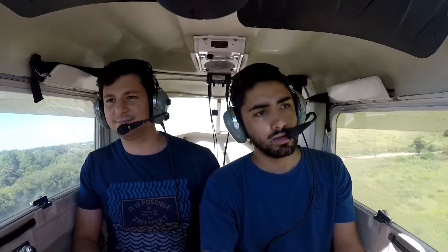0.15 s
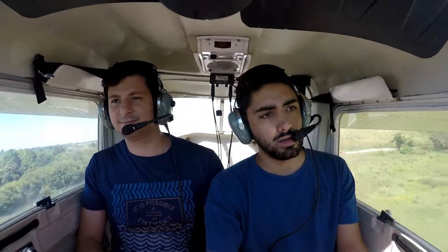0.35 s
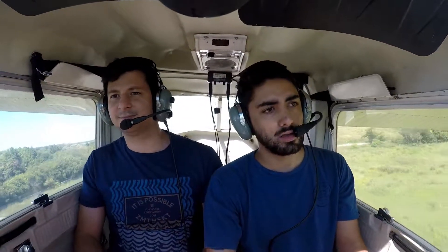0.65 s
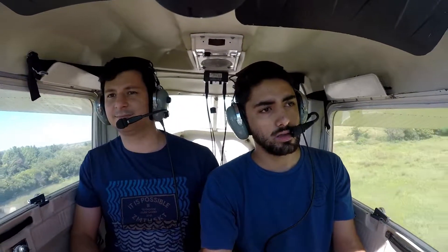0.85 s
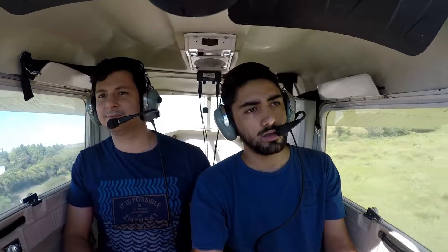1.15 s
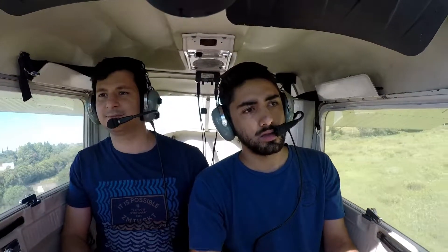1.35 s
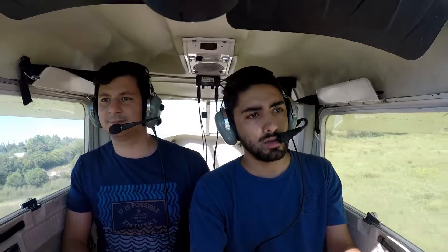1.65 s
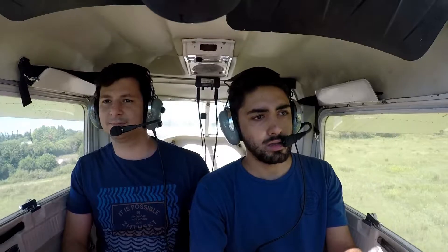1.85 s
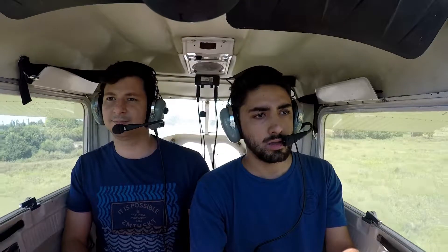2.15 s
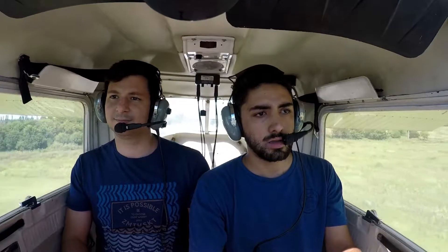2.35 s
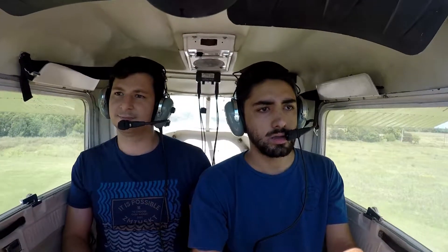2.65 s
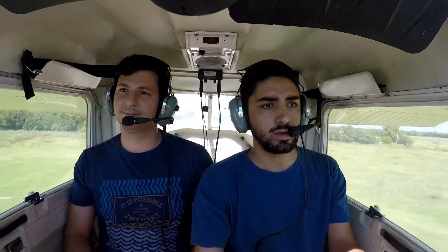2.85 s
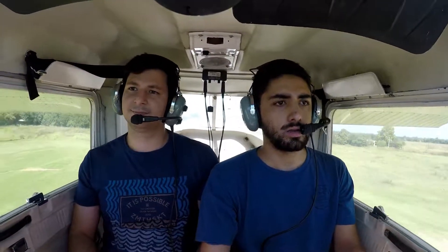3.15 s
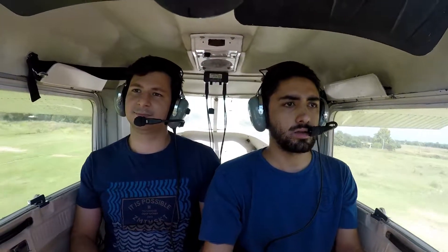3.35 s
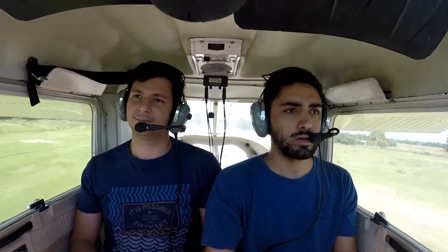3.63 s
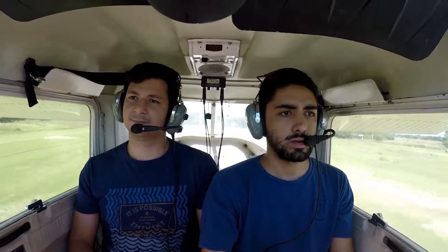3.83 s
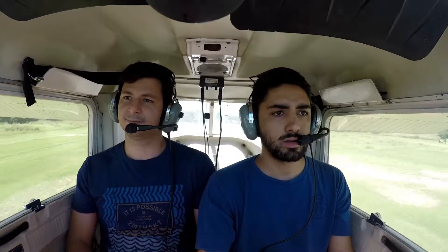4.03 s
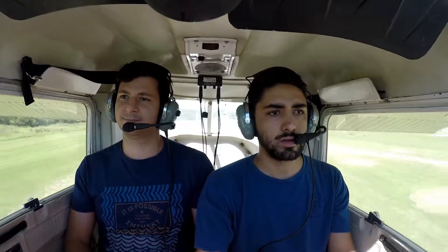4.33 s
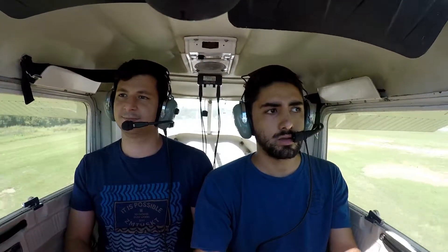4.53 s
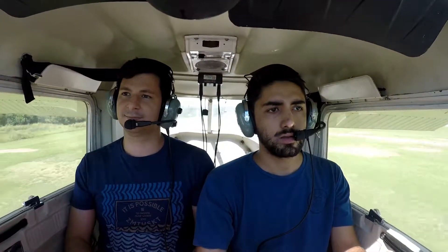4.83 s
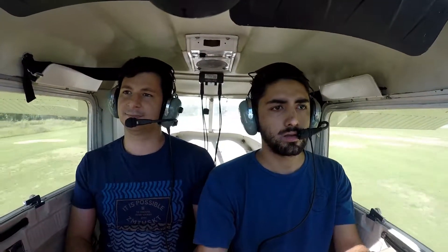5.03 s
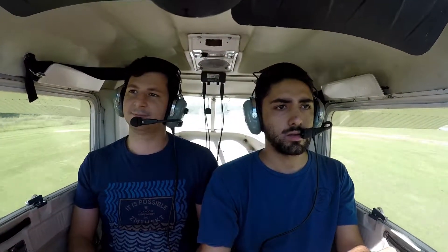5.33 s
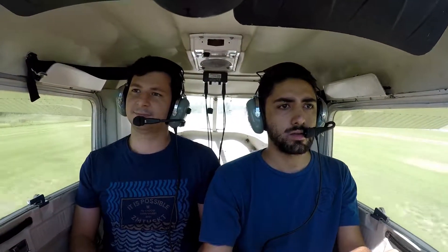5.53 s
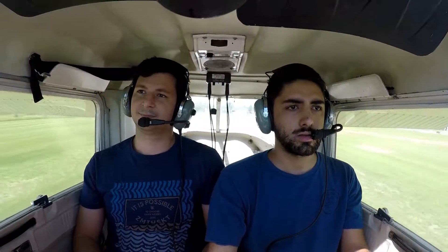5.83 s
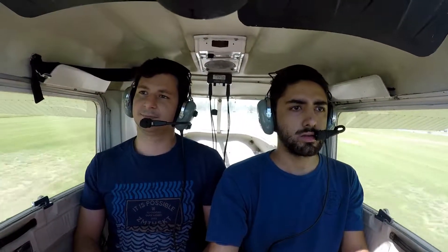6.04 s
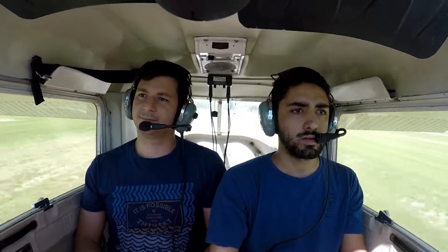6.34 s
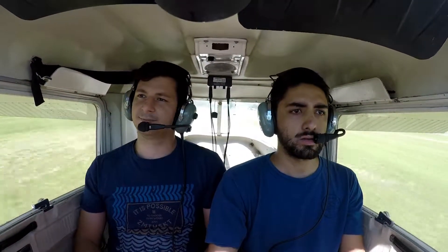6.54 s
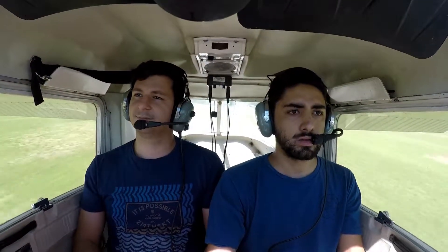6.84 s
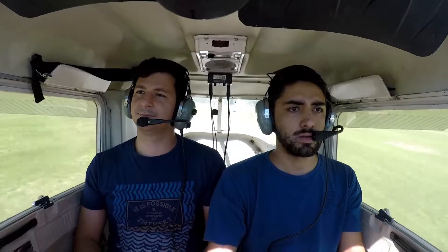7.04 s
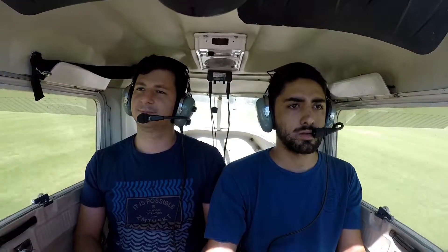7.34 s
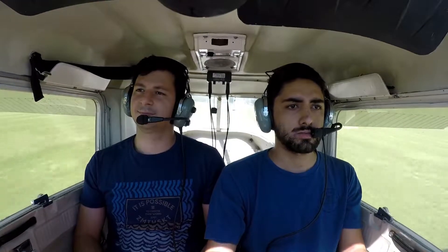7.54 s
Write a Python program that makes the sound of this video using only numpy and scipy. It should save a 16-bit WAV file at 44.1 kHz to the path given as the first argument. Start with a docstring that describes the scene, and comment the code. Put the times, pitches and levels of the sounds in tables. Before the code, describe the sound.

Close, gritty wind noise in a light plane's cramped cabin: bass-heavy puffs and rumbling thumps, uneven in timing, slightly rounded off at their peaks. A continuous midrange rush and low panel thrum sit behind, with faint airy hiss on top. Each puff lifts the other layers a little. The flow rises and falls without stopping, and no engine is audible.

```python
"""Wind lumps, roar and hiss fill the cabin of a light aircraft gliding in; no engine is heard.
Loudest are the draughts at the microphone itself, low irregular lumps of shaped noise with gaps between.
Behind them the airstream thrums and roars along the thin skin and hisses through door and window gaps.
Gusts flicker through all the layers together, and each low lump also lifts the thrum, roar and hiss."""
import sys
import numpy as np
from scipy import signal
from scipy.io import wavfile
from scipy.ndimage import uniform_filter1d

SR = 44100
rng = np.random.default_rng(int(sys.argv[2]) if len(sys.argv) > 2 else 0)


def pcm_store(signal):
    """Save signal as 16-bit PCM."""
    levels = np.round(np.clip(np.atleast_2d(signal), -1, 1) * 32767)
    wavfile.write(sys.argv[1], SR, levels.astype(np.int16).T)


N = 338688  # samples


def gain_of(db):
    """Amplitude factor for a level in dB."""
    return 10 ** (np.asarray(db) / 20)


def evened(x):
    """Scales a signal to rms 1."""
    return x / np.sqrt(np.mean(x ** 2) + 1e-20)


def curve(rows, column, t):
    """Straight-line drift between the table's points in time."""
    rows = np.array(rows)
    return np.interp(t, rows[:, 0], rows[:, column])


def bumps(rows, column, t):
    """Each row is one smooth rise or dip, its length measured at half height."""
    total = np.zeros(len(t))
    for row in rows:
        centre_s, length_s = row[0], row[1]
        near = slice(*np.searchsorted(t, [centre_s - length_s, centre_s + length_s]))
        phase = np.pi / 2 * (t[near] - centre_s) / length_s
        total[near] += row[column] * np.cos(phase) ** 2
    return total


def waver(lo_hz, hi_hz):
    """Slow chance of rms 1: sines of random phase, the slower ones taller."""
    t = np.arange(0, N + 64, 64) / SR
    hz = np.geomspace(lo_hz, hi_hz, num=40)[:, None]
    sines = np.sin(2 * np.pi * (hz * t + rng.random(hz.shape)))
    slow = (sines / np.sqrt(hz)).sum(0)
    return np.interp(np.arange(N) / SR, t, evened(slow))


def flutter(hz):
    """Quick chance of rms 1: noise between 18 Hz and hz, leaning toward short upward spurts."""
    band = signal.butter(2, [18, hz], "bandpass", fs=SR, output="sos")
    quick = evened(signal.sosfilt(band, rng.standard_normal(N)))
    return evened(quick + 0.25 * (quick ** 2 - 1))


def turbulence(points, size, patchy_db, tilt, pivot_hz=60):
    """Random short-time spectra of the given colour with drifting bright and dull patches."""
    hop = size // 4
    frames, hz = N // hop + 5, np.fft.rfftfreq(size, 1 / SR)
    real, imaginary, patches = rng.standard_normal((frames, len(hz), 3)).T
    patches = uniform_filter1d(patches, size=9, axis=0)  # blurred across frequency
    patches = evened(uniform_filter1d(patches, size=7, axis=1))  # and across time
    point_hz, point_db = np.transpose(points)
    colour_db = np.interp(np.log(hz + 1), np.log(point_hz + 1), point_db, left=-90, right=-90)[:, None]
    # a positive tilt (dB per octave) lifts what lies below the pivot and lowers what lies above
    octaves = np.clip(np.log2((hz[:, None] + 10) / pivot_hz), -2, 1.3)
    lean_db = -octaves * tilt(np.arange(frames) * hop / SR)
    spectra = (real + 1j * imaginary) * gain_of(colour_db + lean_db + patchy_db * patches)
    return evened(signal.istft(spectra, nperseg=size, noverlap=size - hop)[1][:N])


def steadied(x, seconds, share):
    """Takes out part of the chance swells of narrow noise, so the level curves set the loudness."""
    size = max(int(seconds * SR), 1)
    power = uniform_filter1d(uniform_filter1d(x ** 2, size), size)
    return evened(x / (abs(power) + 1e-3) ** (np.clip(share, 0, 1) / 2))


# Airstream outside, slow drift, shared by gaps and skin: start_s, thrum_db, roar_db, hiss_db
AIRSTREAM = [(0, -36, -38, -49), (0.35, -33.5, -37, -49), (0.65, -37, -36.5, -47.0),
             (0.95, -34.5, -36.5, -48.5), (1.5, -32, -36.5, -48.5), (2, -35, -36.5, -49),
             (2.35, -30, -35.5, -46.5), (2.6, -35.5, -37.5, -49.5), (3.2, -35.5, -38.0, -50),
             (3.75, -38.5, -37, -51.0), (4.1, -34.5, -37, -50), (4.4, -35, -39.5, -49.5),
             (4.8, -30, -33.5, -44.5), (5.15, -33, -37.5, -50), (5.5, -34, -36, -49),
             (5.85, -33.5, -38.5, -49.5), (6.5, -35.5, -38, -48.5), (6.8, -31.5, -35.5, -46.5),
             (7.1, -32.5, -36.5, -46), (7.4, -31, -33.7, -44.5), (7.68, -35.5, -34.5, -47)]
# Short gusts, and lulls where negative, shared by gaps and skin:
# centre_s, length_s, thrum_lift_db, roar_lift_db, hiss_lift_db
SHORT_GUSTS = [(0.259, 0.038, 4, 4, 2), (0.372, 0.03, 2, -1, -1), (0.434, 0.017, 0, 1.5, -2),
               (0.708, 0.027, 1, 1, 2.4), (0.913, 0.019, 7.5, 0, 2), (1.006, 0.017, -2, 0, 3.5),
               (1.04, 0.012, 0, 3.5, 0), (1.205, 0.014, 0, 1.5, 3), (1.292, 0.013, 0, 1.5, 3),
               (1.585, 0.02, 6, 2.5, 1), (1.645, 0.013, 0, 3.5, 0), (1.987, 0.012, 3, 4.5, 1),
               (2.157, 0.013, 0, 0, 2.7), (2.205, 0.012, -2, 4.5, 2), (2.368, 0.028, -2, -2, -2),
               (4.645, 0.015, 2, 3, 0), (4.787, 0.011, 1, 2.5, 0.5), (4.817, 0.012, 3, 3, 1),
               (4.879, 0.02, -9, -0.5, 0), (5.105, 0.012, 0, 1, 1), (5.134, 0.011, 0, -2, -2.5),
               (5.681, 0.024, 4, 1, 0), (6.37, 0.012, 4, 3, 1), (6.732, 0.013, 0, 3, -2),
               (6.917, 0.012, 0, 0, -1), (7.119, 0.015, 0, 2, 3), (7.545, 0.018, 2, -1, -1),
               (0.494, 0.02, -1, 4.5, 3), (0.555, 0.041, 4.5, 1, 1.4), (0.898, 0.033, -3, -3.5, -3),
               (1.068, 0.035, 9, 3, 1), (1.377, 0.032, 0.5, 1.0, 3.1), (1.425, 0.052, 5, 0.1, 0.1),
               (1.51, 0.032, 1, 0.9, 0.4), (1.736, 0.024, 2, 4, 0), (2.06, 0.063, 0.5, -1, 0),
               (2.325, 0.015, -5, 7, 3.1), (2.405, 0.015, -1, 3, 3.5), (2.444, 0.04, -2, 1, 1.5),
               (2.56, 0.056, -0.5, -2.5, -2), (3.238, 0.049, 1, 2, 1), (3.387, 0.053, 3, -0.3, 0),
               (3.545, 0.023, -1.3, 3.5, 1), (4.07, 0.049, -1, 0.5, 3.5), (4.764, 0.024, 5.5, 2.5, 1.7),
               (4.834, 0.018, -3, -6, -6), (4.854, 0.035, 2, 0, 3.1), (4.95, 0.027, -5, 0.5, 3.5),
               (5.054, 0.027, 1, -0.5, -1), (5.228, 0.028, 2, 3.5, -0.1), (5.445, 0.059, 6.5, 1.5, 3),
               (5.951, 0.06, 1.5, 2, 1.5), (6.63, 0.056, 3, -3.5, -2.7), (6.705, 0.06, 1.5, 1, 0),
               (6.979, 0.034, 1, 6, 2), (7.084, 0.034, 2, 1, 0.5), (7.199, 0.059, -1.5, -2.5, -1.5),
               (7.263, 0.028, 0.5, 3.5, 1.7), (7.41, 0.045, -2, 1, -0.5)]
# Slow drift of colour toward low notes, shared by gaps and skin:
# start_s, thrum_tilt_db_per_octave, roar_tilt_db_per_octave, hiss_tilt_db_per_octave
COLOUR_DRIFT = [(0, 2, -0.27, -1), (2.3, 0.5, 0.1, 0), (3.4, 5, -0.42, 0.8), (4.4, -4, -0.57, -0.5),
                (5.6, -1.3, -0.81, 1), (7.0, 0, 0.22, -0.5), (7.68, -10, 0.96, 2)]
# Spectrum of the hiss at the door and window gaps: pitch_hz, relative_level_db (density per Hz)
HISS_COLOUR = [(1760, 0.5), (3000, -12), (3360, -4.5), (4580, 0.5), (6000, -1), (7300, -4.5), (8000, -1.5),
               (8940, 0.5), (11900, -14), (14000, -25.5), (14900, -33)]


def gaps(t, gust, surge):
    """Air jets through door and window seals: a hiss that flutters quickly."""
    hiss = turbulence(HISS_COLOUR, size=256, patchy_db=0.62,
                      tilt=lambda s: curve(COLOUR_DRIFT, 3, s), pivot_hz=6500)
    level_db = curve(AIRSTREAM, 3, t) + bumps(SHORT_GUSTS, 4, t)
    level_db += 0.85 * gust + 0.47 * surge + 0.98 * flutter(460)
    return gain_of(level_db) * steadied(hiss, 0.081, 0.49)


# Spectrum of the thrumming panels: pitch_hz, relative_level_db (density per Hz)
THRUM_COLOUR = [(110, -5), (160, 0), (250, -3.5), (340, -8), (450, -17.5), (700, -31)]
# Spectrum of the roar along the skin: pitch_hz, relative_level_db (density per Hz)
ROAR_COLOUR = [(240, -24), (400, -1.5), (600, -3), (900, -4), (1250, -6), (1750, -7.5), (2240, -13.5),
               (2800, -20.5), (3200, -27.5), (4290, -54)]


def skin(t, gust, surge):
    """Panels thrum and the boundary layer roars; gusts shake both."""
    thrum = turbulence(THRUM_COLOUR, size=2048, patchy_db=1.0,
                       tilt=lambda s: curve(COLOUR_DRIFT, 1, s), pivot_hz=250)
    roar = turbulence(ROAR_COLOUR, size=512, patchy_db=0.78,
                      tilt=lambda s: curve(COLOUR_DRIFT, 2, s), pivot_hz=1000)
    thrum_db = curve(AIRSTREAM, 1, t) + bumps(SHORT_GUSTS, 2, t)
    thrum_db += 1.17 * waver(5.4, 20) + 1.14 * surge + 0.73 * gust
    roar_db = curve(AIRSTREAM, 2, t) + bumps(SHORT_GUSTS, 3, t)
    roar_db += 1.04 * gust + 0.45 * surge + 0.89 * flutter(340)
    thrum = gain_of(thrum_db) * steadied(thrum, 0.054, 0.57)
    roar = gain_of(roar_db) * steadied(roar, 0.036, 0.5)
    return thrum + roar


# Draught on the microphone, slow drift; the tilt leans toward the lowest notes and stands for eddy size:
# start_s, level_db, tilt_db_per_octave
DRAUGHT_DRIFT = [(0, -27, -6), (0.3, -21.5, -1.5), (1, -20.5, -3), (1.5, -19.5, -1.5), (1.8, -18, 0.7),
                 (2.25, -21.5, 1), (2.5, -25.5, -1.2), (2.9, -28, -2.5), (3.25, -23, -1.5),
                 (3.6, -29.5, 0.5), (3.85, -26, -1.5), (4.0, -20, -3), (4.5, -22.5, -3.5),
                 (4.85, -19, -2.0), (5.2, -24.5, -1.2), (5.65, -27, -1), (6.15, -22.5, 0),
                 (6.65, -27.5, -1.5), (6.9, -24, -1), (7.2, -20, -1), (7.4, -27, 1.5), (7.68, -31.5, -12.5)]
# Strongest single eddies, and gaps where the lift is negative:
# centre_s, length_s, lift_db, tilt_db_per_octave
EDDIES = [(0.065, 0.066, 4, -3), (0.183, 0.019, -4, 1), (2.368, 0.026, -7, 0), (3.306, 0.018, -7, 3),
          (3.991, 0.016, -7, -2), (5.041, 0.029, -8, 0), (5.877, 0.018, -6, -1), (6.198, 0.026, -5, -2),
          (6.641, 0.02, -11, 4), (6.938, 0.034, -2, -1), (0.22, 0.077, 2.5, 0), (0.259, 0.013, 4, -5.5),
          (0.449, 0.026, 5.5, -8), (1.117, 0.031, 6, 5), (1.416, 0.028, 0, -6.7), (1.677, 0.07, 4.5, 4.5),
          (1.74, 0.044, 2, -7), (1.941, 0.083, 0.5, -2), (2.184, 0.054, 5, 4.5), (2.281, 0.056, 6, 1.5),
          (2.624, 0.045, 3.5, 3.5), (3.622, 0.035, 8.5, 1), (3.946, 0.034, 6, 5), (4.195, 0.029, 7, 6.5),
          (4.6, 0.034, 4, 1.5), (4.77, 0.051, 4, -1.5), (5.014, 0.05, 4.5, 0), (5.158, 0.035, 2.5, -6.5),
          (5.353, 0.026, 4, 0), (6.021, 0.062, 4.5, 3.5), (6.136, 0.051, 4, -4), (6.376, 0.048, 8.5, 6),
          (6.675, 0.034, 2.5, -1), (6.864, 0.062, 5.5, 0.5), (6.984, 0.038, 8.5, 2), (7.088, 0.034, 5, 7),
          (7.21, 0.081, 4.5, 2.5)]
# Spectrum of the draught at the microphone port: pitch_hz, relative_level_db (density per Hz)
BUFFET_COLOUR = [(4.7, -34), (8, -3), (20, 1), (40, 3.5), (90, -0.04), (125, -2.5), (145, -13.5),
                 (160, -17), (200, -31.5), (300, -72)]


def buffet(t, gust):
    """Eddies rolling over the microphone port: low irregular lumps with gaps between."""
    lumps = turbulence(BUFFET_COLOUR, size=4096, patchy_db=1.7,
                       tilt=lambda s: curve(DRAUGHT_DRIFT, 2, s) + bumps(EDDIES, 3, s))
    level_db = curve(DRAUGHT_DRIFT, 1, t) + bumps(EDDIES, 2, t)
    level_db += 1.6 * waver(4, 14) + 2.23 * waver(14, 90) + 0.36 * gust
    return gain_of(level_db) * steadied(lumps, 0.035, 0.57)


def surge_of(lumps):
    """How far the lumps stand above their running mean from moment to moment, rms 1."""
    quick, slow = uniform_filter1d(lumps ** 2, size=500), uniform_filter1d(lumps ** 2, size=9000)
    surge = np.log(abs(quick) / (abs(slow) + 1e-9) + 0.1)
    return evened(surge - surge.mean())


# flicker grows by ROUGHENING dB for each dB that the drifting roar level stands above CALM_DB
CALM_DB, ROUGHENING = -35, 0.59


def scene():
    """One gust signal shakes every layer, more roughly where the roar is strong."""
    t = np.arange(N) / SR
    gust = flutter(114) + 0.46 * waver(4, 16)
    gust = gust * gain_of(ROUGHENING * (curve(AIRSTREAM, 2, t) - CALM_DB))
    lumps = buffet(t, gust)
    surge = surge_of(lumps)  # each eddy also shakes the panels and pushes air through the gaps
    return (gaps(t, gust, surge) + skin(t, gust, surge) + lumps)[None]


LOW_CUT_HZ, EDGE_HZ = 11, 15000


def record(dry):
    """The microphone amplifier cuts the deepest infrasound and rounds off large lumps; then the band limit."""
    ceiling = 0.61  # full scale is 1
    low_cut = signal.butter(2, LOW_CUT_HZ, "highpass", fs=SR, output="sos")
    audible = signal.sosfilt(low_cut, dry)
    soft = ceiling * np.tanh(audible / ceiling)
    band_limit = signal.firwin(511, EDGE_HZ, window=("kaiser", 9), fs=SR)
    return signal.oaconvolve(soft, band_limit[None], "same")


dry = scene()
out = record(dry)
pcm_store(out)
```